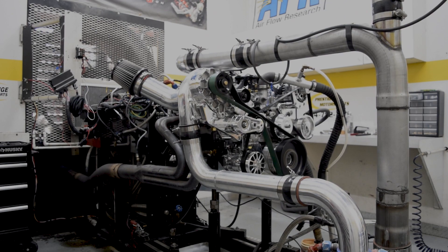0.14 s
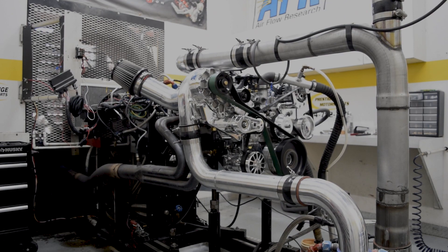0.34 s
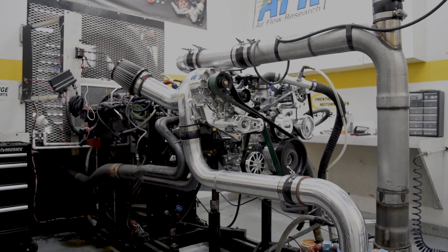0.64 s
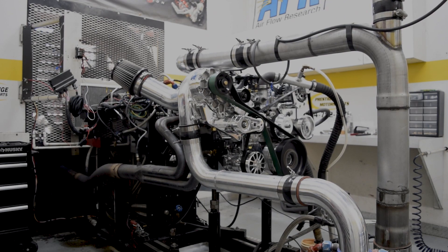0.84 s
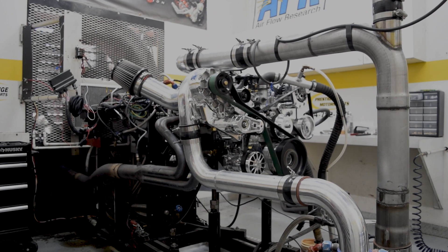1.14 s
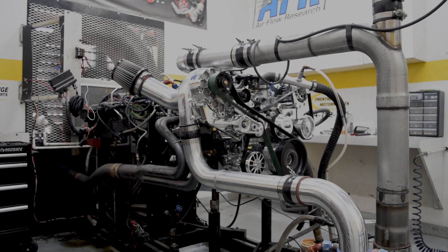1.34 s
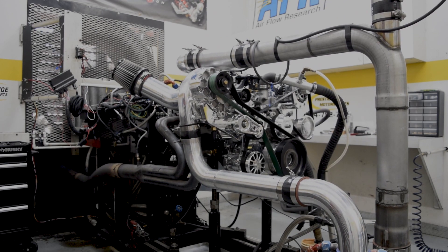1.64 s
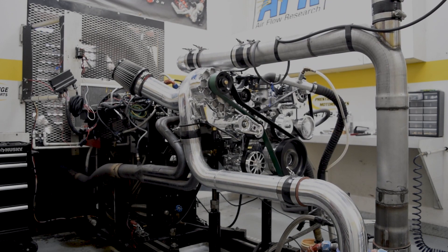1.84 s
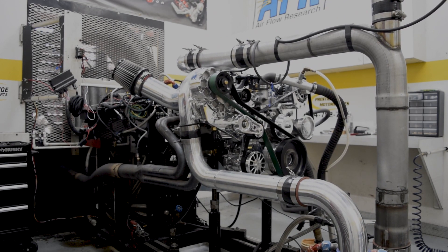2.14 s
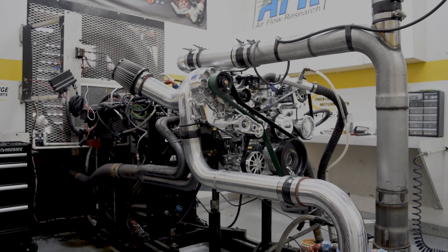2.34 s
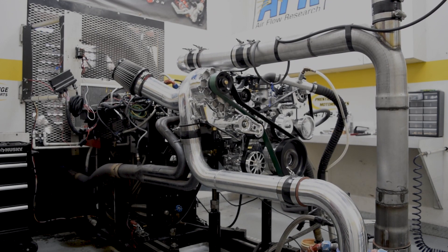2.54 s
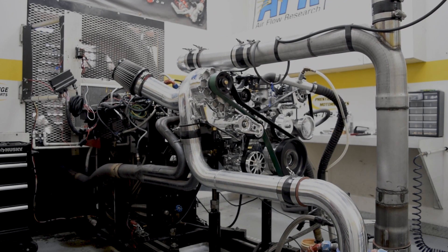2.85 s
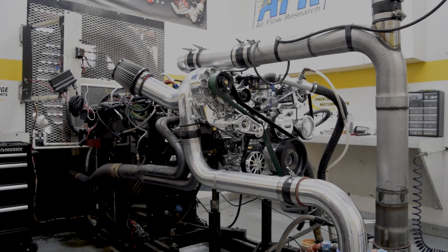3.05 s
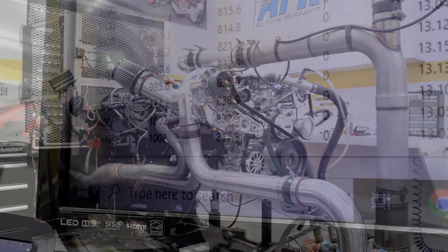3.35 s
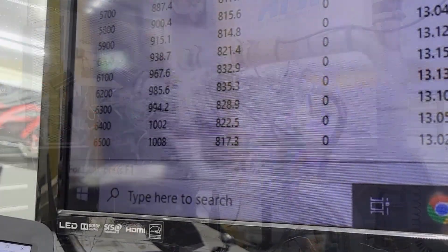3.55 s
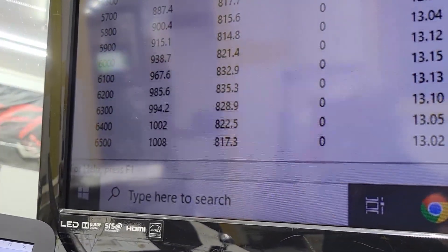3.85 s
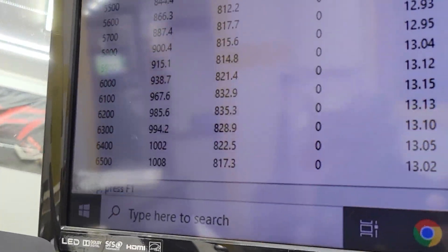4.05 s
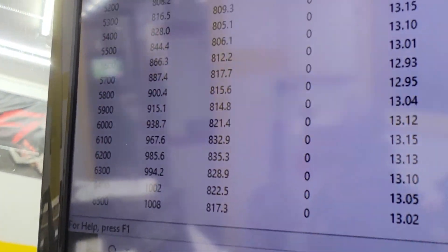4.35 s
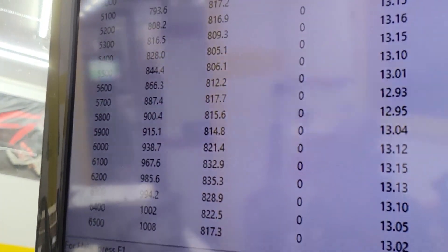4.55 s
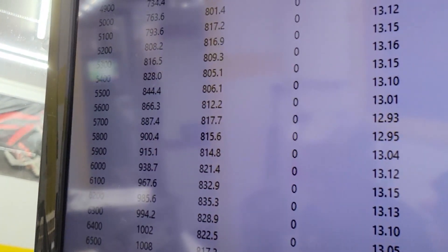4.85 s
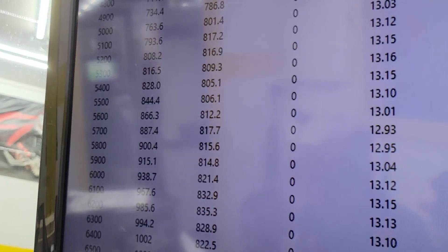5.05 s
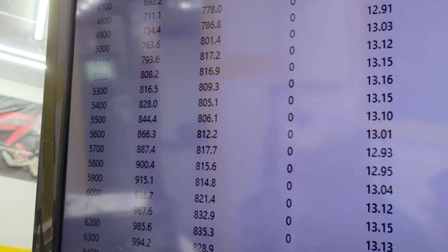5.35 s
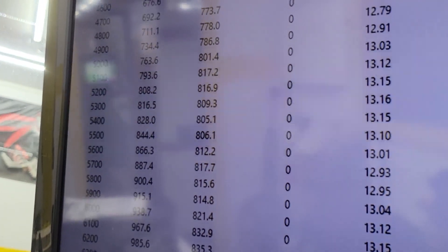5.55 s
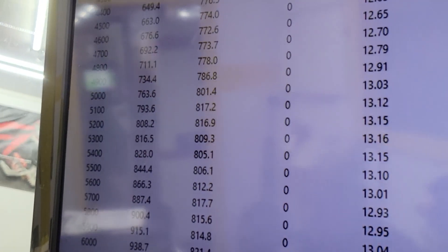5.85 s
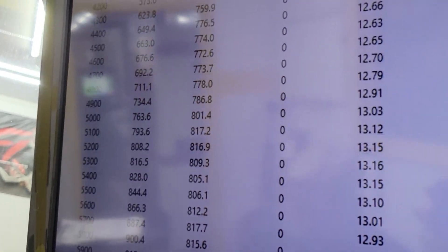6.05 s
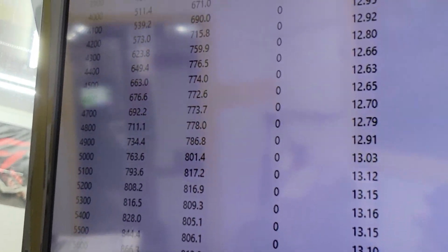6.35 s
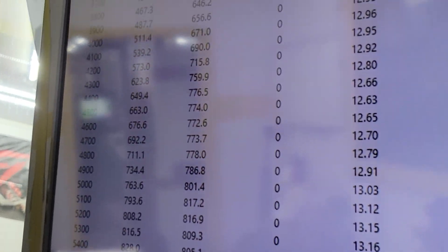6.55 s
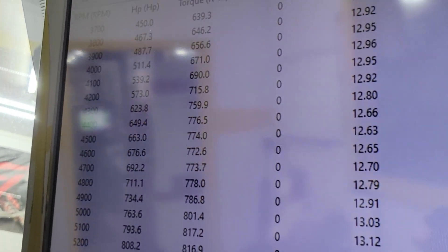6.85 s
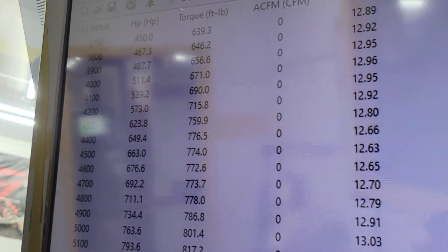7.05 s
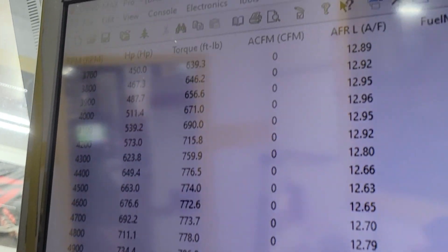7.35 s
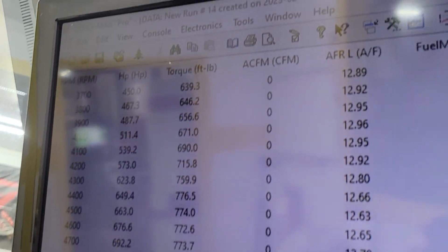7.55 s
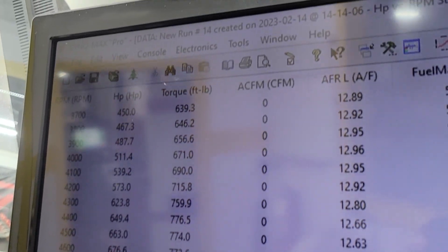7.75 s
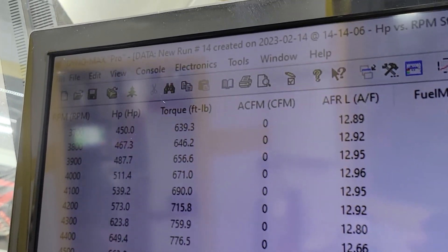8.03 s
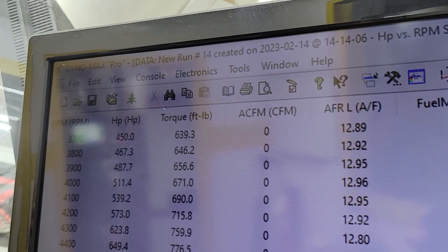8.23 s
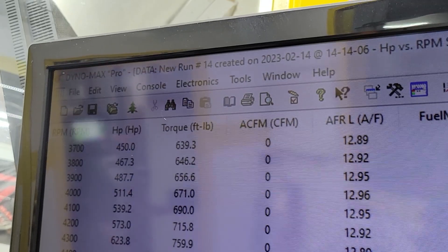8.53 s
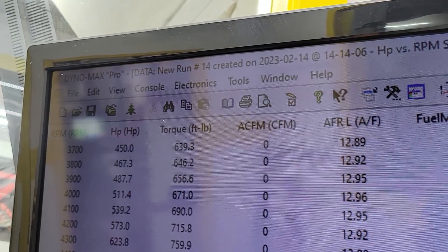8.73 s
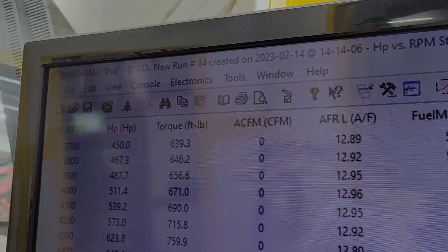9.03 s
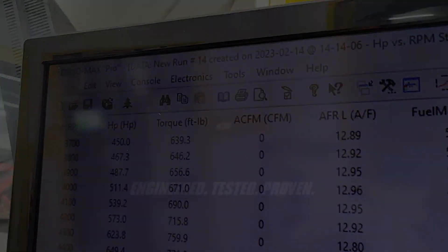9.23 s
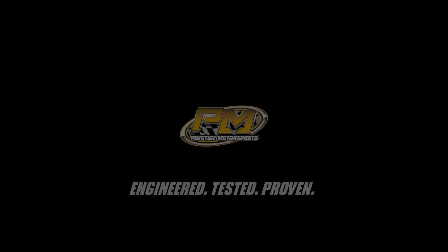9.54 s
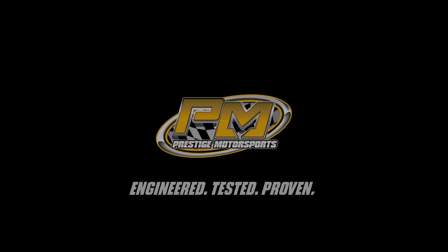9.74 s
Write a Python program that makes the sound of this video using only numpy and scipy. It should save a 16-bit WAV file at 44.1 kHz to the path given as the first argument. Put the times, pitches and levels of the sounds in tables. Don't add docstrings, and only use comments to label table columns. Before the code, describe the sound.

One fixed microphone near the engine, identical in both ears, mostly direct sound with short hard echo. A dense, buzzing full-throttle roar lasts just over a second, then collapses with a cluster of stuttering pops. The whine glides down quickly, bounces up a little, and drifts lower over a far quieter idle of low throbbing, airy hiss, shivering gear noise and faint room hum.

```python
import sys
import numpy as np
from scipy import signal
from scipy.fft import rfft, irfft, next_fast_len
from scipy.io import wavfile
from scipy.ndimage import uniform_filter1d

SR = 44100
rng = np.random.default_rng(int(sys.argv[2]) if len(sys.argv) > 2 else 0)


def persist_wave(psi):
    counts = np.round(np.clip(psi, -1, 1) * 32767).astype(np.int16)
    wavfile.write(sys.argv[1], SR, np.atleast_2d(counts).T)


def amplitude_ratio(level_db):
    exponent = np.asarray(level_db, float) / 20
    return 10 ** exponent


N = 436145

# (time [s], engine cycle rate [Hz])
PULL_SPEED = [
    (0.0, 52.24),
    (0.46, 54.2),
    (0.755, 55.4),
    (0.916, 55.1),
    (0.996, 54.05),
    (1.146, 50.93),
    (1.202, 48.52),
    (1.404, 43.58),
    (1.45, 41.78),
]
# (time [s], blower mesh rate [Hz])
COAST_SPEED = [(1.55, 4900), (1.62, 4600), (1.72, 3860), (1.92, 2870), (2.05, 2561), (2.32, 2720),
               (2.9, 2725), (3.3, 2630), (4.0, 2420), (4.8, 2170), (5.3, 2030), (5.7, 1950), (8.0, 1905),
               (9.62, 1930), (9.69, 1850), (9.75, 1660), (9.8, 1640), (9.89, 1296)]
# (time of peak [s], rise of mesh rate [Hz])
IDLE_LURCHES = [(3.97, 35), (5.4, 25), (5.82, 50), (6.03, 50), (6.26, 50), (6.42, 40), (6.58, 85),
                (6.79, 40), (7.05, 75), (7.22, 60), (7.35, 75), (7.5, 60), (7.62, 130), (7.83, 65),
                (8.06, 60), (8.29, 65), (8.45, 30), (8.99, 35), (9.19, 30), (9.47, 60)]
# (time [s], level [dB])
ROAR_LEVEL = [(0.0, -8.5), (1.05, -9), (1.2, -8), (1.43, -10), (1.46, -15.5), (1.52, -16), (1.62, -23),
              (1.79, -32), (2.0, -34.5), (2.18, -35), (2.4, -34), (3.3, -34.5), (5.5, -35.5), (9.72, -35.5),
              (9.89, -38.5)]
# (frequency [Hz], density [dB per Hz])
LOADED_COLOUR = [(13, -36), (22, -44), (49, -6.5), (203, -6), (283, -8.5), (760, -6), (974, -2), (1280, -8),
                 (1390, -8.5), (2480, -9.5), (4170, -11), (6300, -10.5), (10600, -18), (13200, -20),
                 (15600, -25.5)]
# (frequency [Hz], density [dB per Hz])
IDLE_COLOUR = [(13, -47), (22, -7), (85, -1.5), (182, -6.5), (227, -0.5), (307, -4), (383, 0), (1690, -6.5),
               (1990, -6), (3950, -12), (6130, -18.5), (7850, -17.5), (10300, -26), (12900, -27),
               (15600, -34)]
# (time of peak [s], rise of rumble, negative for a
# dip [dB], swell [s])
RUMBLE_THUMPS = [(1.6, -16, .12), (1.95, 6, 0.047), (2.41, 17, 0.1), (2.84, 14, 0.11), (3.29, 28, 0.081),
                 (3.83, 13, .06), (4.05, 8, .05), (4.3, 16, .09), (4.55, 17, 0.057), (4.76, 17.5, 0.057),
                 (5.01, 14, .05), (5.15, 24, 0.035), (5.35, 6.5, 0.073), (5.7, 6, .15), (6.44, 11.5, .05),
                 (9.06, 9, .2)]
# (multiple of the cycle [1], level [dB])
PIPE_COLOUR = [(1, -33), (3, -12.5), (11, -10), (17, -4), (27, -2.5), (31, -6), (40, -10.5), (46, -12.5)]
# (multiple of the cycle [1], level off the pipe colour [dB])
UNEVEN_ORDERS = [(5, -2), (8, 6), (13, 3), (17, 2), (18, 3), (19, -2), (20, -3), (21, -3), (22, 1),
                 (23, -5), (24, -6), (25, -4), (26, 1), (27, -1), (28, -4), (29, -3), (30, 2), (32, -6),
                 (35, 3), (39, 5), (46, -4), (51, 6), (53, -8), (54, 6)]
# (multiple of the cycle [1], level [dB])
IDLE_LINES = [(2, -14.5), (4, -3), (8, -13), (12, -23)]
# (cycle rate [Hz], width [Hz], level [dB])
IDLE_BEATS = [(23.4, 2.2, -46), (19.6, 1, -50), (17, 2, -60)]
# (multiple of the mesh rate [1], frequency [Hz], width [Hz], level at idle [dB])
WHINE_RESONANCES = [(1, 6280, 420, -44.5), (1, 5400, 500, -58), (1, 2700, 300, -59), (2, 12500, 1500, -62),
                    (2, 8100, 750, -51), (2, 5500, 230, -59), (2, 4700, 400, -61.5), (2, 3880, 220, -54.5),
                    (2, 3300, 200, -50), (2, 2800, 300, -56), (4, 8300, 1100, -54.5), (4, 10600, 600, -72),
                    (4, 13500, 2500, -76), (6, 14600, 1200, -73), (8, 13500, 1300, -68),
                    (6, 9500, 1500, -76), (3.5, 7600, 500, -60), (3.5, 8550, 450, -64),
                    (4.55, 10000, 700, -70)]
# (frequency [Hz], width [Hz], level [dB])
HOUSING_MODES = [(8600, 60, -63), (9050, 60, -67)]
# (frequency [Hz], width [Hz], level [dB])
CELL_MODES = [(76.3, 8, -57.5), (111, 9.2, -53.5), (154, 8.7, -56.5), (234.5, 14, -60.5), (390, 60, -55)]
# (time of peak [s], peak level [dB], pitch [Hz], swell [s])
PIPE_POPS = [
    (.39, -17, 910, .08),
    (1.41, -12, 610, 0.032),
    (1.415, -13.5, 546, 0.031),
    (1.48, -18, 546, 0.056),
    (1.52, -14, 390, 0.025),
    (1.529, -18, 510, 0.028),
    (1.581, -26, 281, 0.12),
    (1.655, -42, 223, .06),
    (1.72, -32, 630, 0.075),
]

MESH_PER_CYCLE = 116.6
LURCH_S = 0.055
IDLE_DB, FULL_DB = -33, -14
LIFT_S, LIFT_LENGTH_S = 1.08, 0.13
VENT_S, VENT_DB, VENT_LENGTH_S = 1.43, 2.5, 0.03
INTAKE_DB, INTAKE_SHUT_DB, LEAK_DB, LEAK_SHUT_DB = 1.5, -3.5, -3.24, -1
FLOOR_DB, FLOOR_LOADED_DB = -10.5, -10
SHAKE_HISS = 0.054
TOP_ORDER = 54
COMB_DB, COMB_SHUT_DB, COMB_IDLE_DB = -4, -2, -34
WHINE_IDLE_DB = -35
UNLOADED_GAIN_DB = 4.0
CELL_T60_S, DIRECT_SHARE = 0.5, 0.6
TOP_HZ = 15720
INPUT_GAIN, CEILING, KNEE = 1.244, 0.53, 5


def curve(table, column=1):
    rows = np.array(table, float)
    return np.interp(np.arange(N) / SR, rows[:, 0], rows[:, column])


def colour(table, hz):
    rows = np.array(table, float)
    return np.interp(np.log(np.maximum(hz, 1)), np.log(rows[:, 0]), rows[:, 1])


def bump(x, centre, width):
    return np.exp(-np.log(2) * ((x - centre) / width) ** 2)


def walk(rate, size=N):
    hold = int(SR / rate)
    held = np.repeat(rng.standard_normal(N // 40)[:size // hold + 1], hold)
    return 1.3 * uniform_filter1d(uniform_filter1d(held, hold), hold)[:size]


def tone(turns, rate, rough):
    size = len(turns)
    wander = 1 + rough * (walk(rate, size=size) + 1j * walk(rate, size=size))
    start = rng.random()
    line = np.real(wander * np.exp(2j * np.pi * (turns + start)))
    return line * np.sqrt(2 / (1 + 2 * rough ** 2))


def walls(x):
    t = np.arange(SR) / SR
    tail = rng.standard_normal(SR) * np.exp(-np.log(1000) * t / CELL_T60_S) * (t > 0.004)
    tail = tail * np.sqrt((1 - DIRECT_SHARE) / np.sum(tail ** 2))
    lead = SR // 4
    echo = signal.fftconvolve(np.pad(x, (lead, 0), "reflect"), tail)[lead:lead + N]
    return np.sqrt(DIRECT_SHARE) * x + echo


def roar(cycle, load, shut):
    t = np.arange(N) / SR
    size = next_fast_len(N)
    hz = np.arange(size // 2 + 1) * SR / size
    white = rfft(rng.standard_normal(size))
    body = (hz > 200) & (hz < 3000)
    idle, full = amplitude_ratio(colour(IDLE_COLOUR, hz)), amplitude_ratio(colour(LOADED_COLOUR, hz))
    idle = idle / np.sqrt(2 * np.sum(idle[body] ** 2) / size)
    full = full / np.sqrt(2 * np.sum(full[body] ** 2) / size)

    thump_db = sum(db * bump(t, s, swell) for s, db, swell in RUMBLE_THUMPS)
    surge_db = SHAKE_HISS * thump_db + VENT_DB * bump(t, VENT_S, VENT_LENGTH_S)
    leak_db = LEAK_DB + LEAK_SHUT_DB * shut * load + 0.5 * walk(7.7) + surge_db
    hiss_db = INTAKE_DB + INTAKE_SHUT_DB * shut * load + 0.51 * walk(9.2) + surge_db
    rumble_db = FLOOR_DB + (FLOOR_LOADED_DB - FLOOR_DB) * load + thump_db + 1.3 * walk(9.7)
    rumble_top_hz = 85 * (1 + (0.7 + 1.3 * shut) * load)

    out = 0
    for centre in 22 * 2 ** np.arange(0, 10, 0.5):
        octaves = np.log2(np.maximum(hz, 1) / centre)
        band = white * np.cos(np.pi * np.clip(octaves, -0.5, 0.5)) ** 2
        quiet = irfft(band * idle, size)[:N]
        loud = irfft(band * full, size)[:N]
        leak_share = np.clip(np.log2(centre / 5800), 0, 1)
        intake_share = np.clip(np.log2(centre / 2400), 0, 1) - leak_share
        db = hiss_db * intake_share + leak_db * leak_share
        db = db + rumble_db * np.clip(1.8 * np.log2(rumble_top_hz / centre), 0, 1)
        db = db + 0.6 * walk(9.7) + 0.47 * np.clip(np.log2(centre / 3000), 0, 1) * walk(45)
        out = out + amplitude_ratio(db) * ((1 - load) * quiet + load * loud)
    throb = 1 + 0.039 * np.cos(8 * np.pi * cycle) + 0.055 * np.cos(16 * np.pi * cycle) + 0.058 * walk(120)
    return out * throb * amplitude_ratio(curve(ROAR_LEVEL) - 3.15 * load - 1.34)


def firings(cycle_hz, load, shut):
    cycle = np.cumsum(cycle_hz) / SR
    uneven_db = {round(k): db for k, db in UNEVEN_ORDERS}
    pull = 2 * SR
    comb = 0
    for k in range(1, TOP_ORDER + 1):
        level = amplitude_ratio(colour(PIPE_COLOUR, k) + uneven_db.get(k, 0))
        comb = comb + level * tone(k * cycle[:pull], 5 + 0.6 * k, 0.26 + 0.013 * k)
    comb = np.pad(comb / np.std(comb[:SR]), (0, N - pull))
    comb_db = curve(ROAR_LEVEL) + COMB_DB + COMB_SHUT_DB * shut + COMB_IDLE_DB * (1 - load)
    comb = walls(comb * amplitude_ratio(comb_db))
    beat = sum(amplitude_ratio(db) * bump(cycle_hz, hz, width) for hz, width, db in IDLE_BEATS)
    idle_lines = sum(amplitude_ratio(db) * tone(k * cycle, 6, 0.18) for k, db in IDLE_LINES)
    return comb + beat * idle_lines


def blower(mesh_hz, load):
    shiver = 0.0008 + 5.2e4 / mesh_hz ** 2 * (1 - load)
    turns = np.cumsum(mesh_hz * (1 + shiver * walk(70))) / SR
    whine = 0
    for k in (1, 2, 4, 6, 8, 3.5, 4.55):
        swell = sum(amplitude_ratio(db) * bump(k * mesh_hz, hz, width) for m, hz, width, db in WHINE_RESONANCES if m == k)
        whine = whine + swell * (k * mesh_hz < TOP_HZ) * tone(k * turns, 70 + 25 * k, 0.8)
    whine = whine * amplitude_ratio(curve(ROAR_LEVEL) - WHINE_IDLE_DB)
    slow = np.clip((2600 - mesh_hz) / 100, 0, 1)
    rings = sum(amplitude_ratio(db) * tone(hz * np.arange(N) / SR, width, 3) for hz, width, db in HOUSING_MODES)
    return walls(whine * amplitude_ratio(1.5 + UNLOADED_GAIN_DB * (1 - load))) + slow * rings


def cell():
    t = np.arange(N) / SR
    return sum(amplitude_ratio(db) * tone(hz * t, width, 10.0) for hz, width, db in CELL_MODES)


def pops():
    t = np.arange(N) / SR
    out = 0
    for s, db, hz, swell in PIPE_POPS:
        age = np.clip((t - s) / swell, -1, 0.5)
        shape = np.cos(np.pi * np.where(age < 0, age / 2, age)) ** 2
        out = out + amplitude_ratio(db) * shape * np.sin(2 * np.pi * hz * (t - s) * (1 - 0.53 * (t - s)))
    return out


def scene():
    t = np.arange(N) / SR
    speed = [(s, hz * MESH_PER_CYCLE) for s, hz in PULL_SPEED] + [*COAST_SPEED]
    mesh_hz = curve(speed) + sum(hz * bump(t, s, LURCH_S) for s, hz in IDLE_LURCHES)
    cycle_hz = mesh_hz / MESH_PER_CYCLE
    load = np.clip((curve(ROAR_LEVEL) - IDLE_DB) / (FULL_DB - IDLE_DB), 0, 1)
    shut = np.clip((t - LIFT_S) / LIFT_LENGTH_S, 0, 1)
    engine = roar(np.cumsum(cycle_hz) / SR, load, shut) + firings(cycle_hz, load, shut)
    mono = engine + blower(mesh_hz, load) + cell() + pops()
    return np.array([mono, mono])


def band_limit(x):
    return signal.sosfilt(signal.butter(12, 17070, fs=SR, output="sos"), x)


def record(dry):
    loud = INPUT_GAIN * dry
    rounded = loud / (1 + np.abs(loud / CEILING) ** KNEE) ** (1 / KNEE)
    top_cut = signal.ellip(12, 0.3, 80, TOP_HZ, fs=SR, output="sos")
    return band_limit(signal.sosfilt(top_cut, rounded))


dry = scene()
out = record(dry)
persist_wave(out)
```